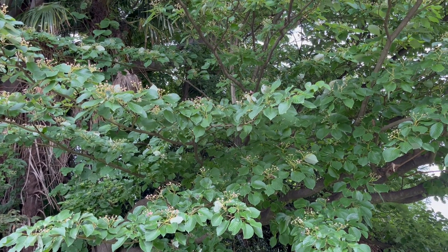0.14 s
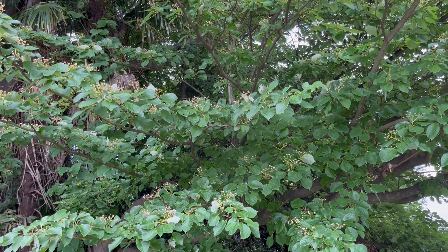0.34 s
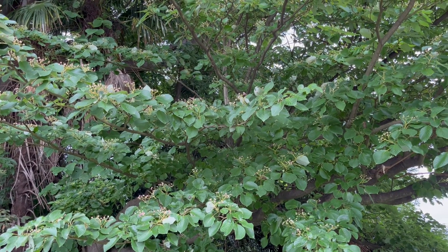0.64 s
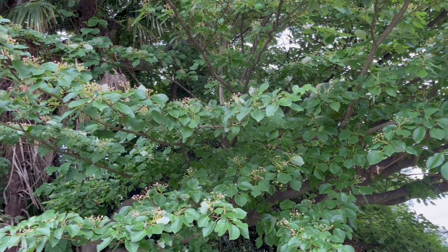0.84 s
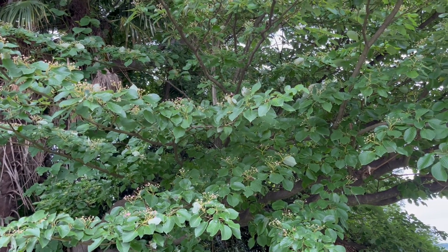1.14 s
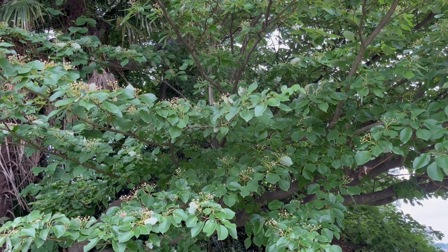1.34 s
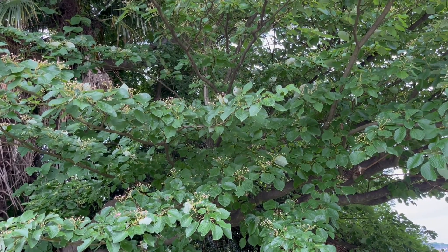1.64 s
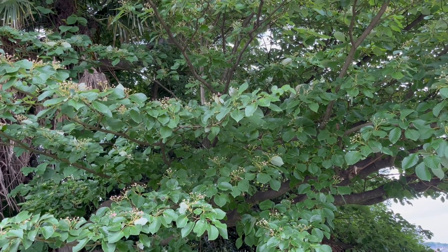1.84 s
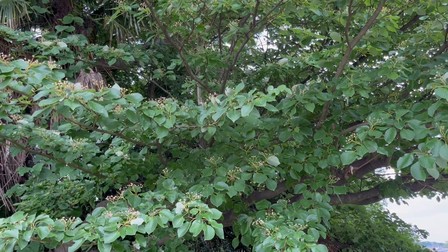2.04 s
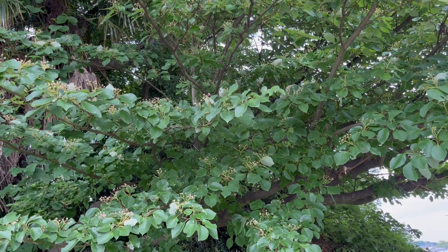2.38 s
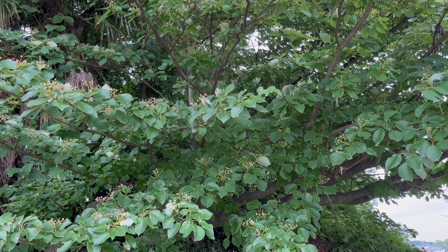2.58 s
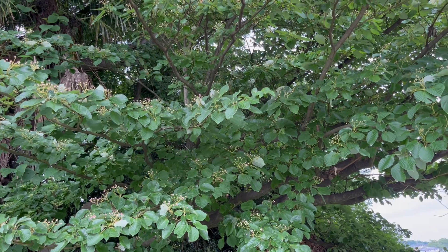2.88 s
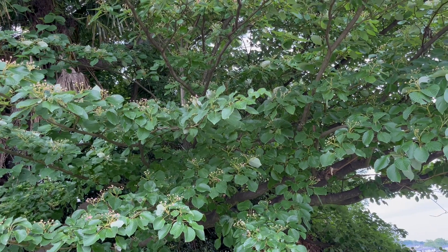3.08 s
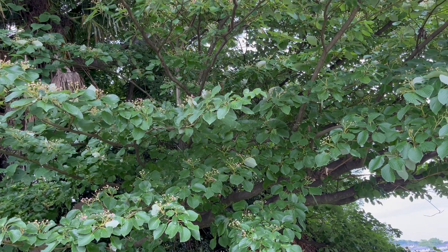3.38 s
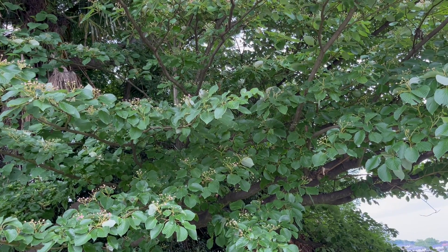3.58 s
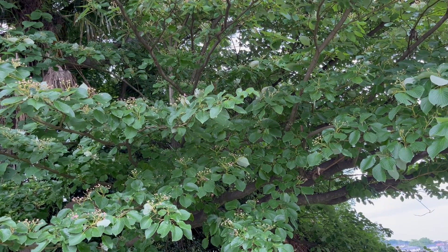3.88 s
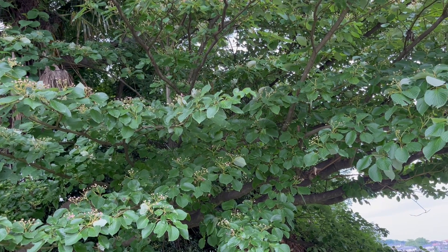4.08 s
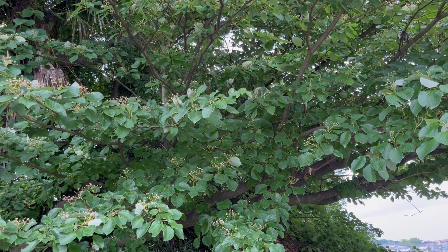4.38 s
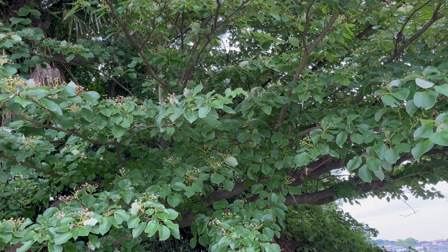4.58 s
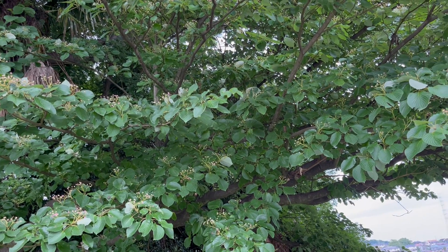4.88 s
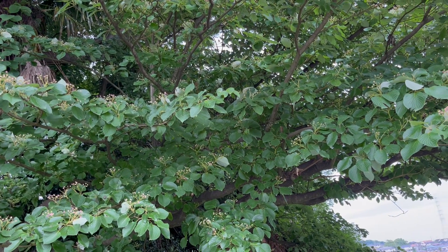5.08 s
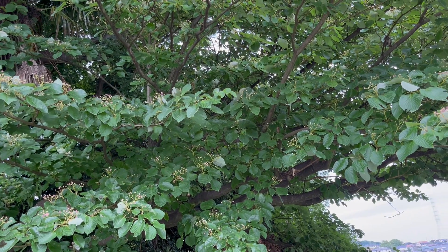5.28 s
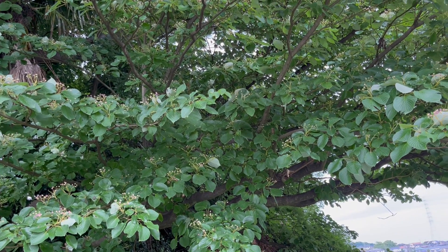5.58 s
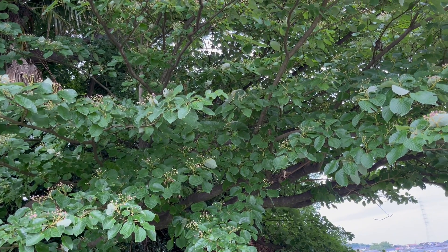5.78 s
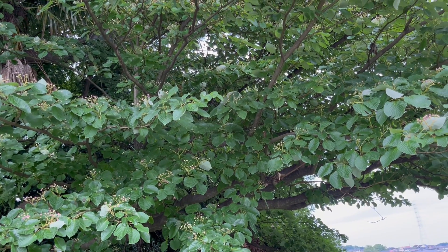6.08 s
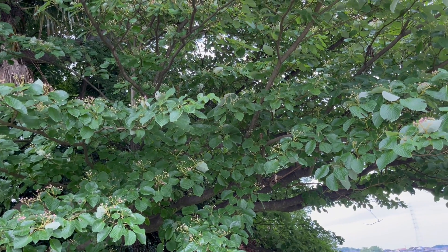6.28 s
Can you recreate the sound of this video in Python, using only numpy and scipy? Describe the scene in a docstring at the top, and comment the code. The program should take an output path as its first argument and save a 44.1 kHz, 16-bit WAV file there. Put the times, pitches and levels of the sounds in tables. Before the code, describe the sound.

Cicadas in leafy trees at the edge of open fields, heard in stereo. From 0 to 2.3 seconds the nearest, a little left, alternates ringing buzzes around 4.5 kHz with thin, very high sizzles at about 0.3-0.5, 0.6-0.8, 1.2-1.5 and 2.0-2.3; short rasps and faint whistles edge some notes. From about 2.3 to 2.6 its rapid clicks slow and it tips into a long rattling trill, strongest until 3.5, then ever slower, looser and fainter until 5.6. At about 5.7 it starts again with quick ringing pulses up to 6.4. Throughout, neighbours deeper in the foliage add softer buzzes and high sizzling bursts, notably around 1.8, 2.7, 3.3, 3.9-4.4 and 4.8, blurred by leaf echoes. Behind them lie a continuous, gently swelling insect hiss and a faint low rumble.

```python
"""Cicadas sing in the trees at the edge of fields, over a far chorus and a low rumble.
The nearest one swings between a ringing 4.5 kHz note and a thin 13 kHz sizzle, runs down in a long
rattling trill, then starts again. All along, neighbours join in with both voices.
Each song is a train of clicks that rings the insect's abdomen; echoes from leaves scatter the clicks.
The chorus and the open air are shaped noise."""
import sys
import numpy as np
from scipy import signal
from scipy.fft import rfft, irfft
from scipy.io import wavfile
from scipy.ndimage import uniform_filter1d

SR = 44100
rng = np.random.default_rng(int(sys.argv[2]) if len(sys.argv) > 2 else 0)


def transcribe(signal):
    """Save signal, clipped to [-1, 1], as a 16-bit WAV file at the path in sys.argv[1]."""
    frames = np.atleast_2d(signal).T
    limited = np.clip(frames, -1, 1)
    pcm = np.round(limited * 32767).astype(np.int16)
    wavfile.write(sys.argv[1], SR, pcm)


N = 283563
TIME = np.arange(N) / SR
BINS = np.fft.rfftfreq(N, 1 / SR)

# The near cicada's click rate before jitter; it sags into the trill and picks up after it.
# Columns: time_s [s], rate [clicks per second]
NEAR_CLICK_RATE = [(0, 171.7), (.15, 172.6), (.3, 173.3), (.72, 172.2), (1.05, 172.4), (1.57, 171.2),
                   (1.75, 169), (1.85, 167.1), (1.95, 165.3), (2.29, 163.8), (2.37, 156.3), (2.46, 150),
                   (2.6, 144), (5.6, 169), (5.8, 169.8), (6.08, 173.1), (6.2, 174.3), (6.41, 175.8)]
# Tone colour of every sizzle. Columns: pitch_hz [Hz], relative level_db [dB]
SIZZLE_SPECTRUM = [(7000, -77), (8800, -33.5), (9600, -15.5), (10400, -15), (11200, -9), (12000, -6),
                   (12800, -3), (13600, -4), (15000, -0.5)]


def near_cicada():
    """One train of clicks rings the abdomen, rasps at the ends of notes, or sizzles when it is damped."""
    clicks = tymbals(NEAR_CLICK_RATE, jitter=.0016, rough=.08, limp=.06, unevenness=.08)
    scattered = foliage(spread(clicks, lag=.0036), wet_db=-2, t60=.2, stir=1.8)
    notes = ringing_notes(scattered)
    low_voice = notes * gain_of(-1.96) + whistle(notes) * gain_of(0.5) + rasp(scattered) * pan(left_db=3.5)
    return low_voice + near_sizzle(clicks) * gain_of(2.5)


def ringing_notes(scattered):
    """Notes whose clicks ring the abdomen, stretched to other sharp modes for each note."""
    # Columns: start_s [s], end_s [s], level_db [dB, before the voice's gain],
    # swell_db [dB from start to end], fade [dB per s], left_minus_right_db [dB],
    # modes as (pitch_hz [Hz], boost_db [dB])
    note_table = [(-.02, 0.15, -27, 1.5, 221, 0.79, [(4310, 6.5), (4480, 2), (4830, 10), (5168, 14.5),
                  (5515, 9), (6550, 7), (7240, 9)]), (0.215, 0.3, -35, 0, 131, 1.8, [(4330, 4), (4800, 13),
                  (6580, 8), (7100, 9)]), (0.84, 1.03, -28.5, 4.5, 100, 3.2, [(4140, 6.5), (4310, -0.5),
                  (4480, 8), (4830, 7), (5000, 0), (5170, 10), (6550, 11.5)]),
                  (1.564, 1.616, -29.5, 1.5, 200, 4.2, [(3940, 3), (4100, 5), (4440, 4), (4780, 8.5),
                  (4950, 6)]), (1.705, 1.77, -31, 2.5, 280, 3.9, [(4060, 9), (4400, 2), (4735, 10),
                  (4900, 5), (5240, 7), (6430, 10.5)]), (1.855, 1.899, -29, 1.5, 188, 3.55, [(4010, 4),
                  (4345, 8.5), (4845, 9), (5180, 11), (5515, 5), (6860, 9)]),
                  (2.335, 2.35, -34.5, -1, 200, 4.6, [(3680, 18), (4330, 7), (4700, 3), (5400, 10)]),
                  (2.412, 2.44, -33.5, -2.5, 200, 3.7, [(3980, 13), (4280, 11), (4600, 11), (4910, 18)]),
                  (2.51, 2.564, -35.5, -1, 130, 3.6, [(3900, 18), (4270, 10.5), (4450, 1), (4700, 7)]),
                  (5.737, 5.789, -32.5, 1, 198, 4.8, [(3730, 6), (4070, 3), (4410, 1.5), (4740, 4),
                  (5080, 8.5)]), (5.879, 5.962, -32, 1.5, 200, 3.5, [(4110, 7), (4440, 1), (4790, 9),
                  (5300, 9), (5640, -4)]), (6.055, 6.121, -28.5, 0, 200, 4.1, [(4150, 3), (4330, 10.5),
                  (4850, 9), (5200, 7), (5540, 8)]), (6.185, 6.27, -27, 2.5, 328, 5.5, [(4360, 10.5),
                  (4535, 5), (4710, 6), (4885, 13), (5230, 4), (6100, 5)]),
                  (6.38, 6.45, -36.5, -1, 130, 3.5, [(4395, -1), (4900, 6), (5100, 9)])]
    # Columns: pitch_hz [Hz], relative level_db [dB]
    note_spectrum = [(1500, -77), (2300, -16), (3000, -21), (3600, -1.5), (4000, 3), (4400, 8.5),
                     (4900, 2.5), (5300, 1), (5700, -2), (6300, -3.5), (6900, -3), (7400, -5.5),
                     (8200, -63)]
    notes = 0
    for *note, fade, left_db, modes in note_table:
        body = abdomen(scattered, note_spectrum, modes)
        notes = notes + body * phrases([note], attack=0.105, fade=fade) * pan(left_db)
    return notes


def whistle(notes):
    """The hollow abdomen tunes in to one overtone of the click rate, which swells to a whistle."""
    # Columns: middle_s [s], level_db [dB, before the whistle's gain], half_length_s [s]
    whistle_table = [(0.124, -37, 0.036), (1.007, -42, 0.042), (1.589, -32, 0.02), (1.855, -28, 0.021),
                     (6.226, -43, 0.034)]
    overtone_number = 26
    overtone = steadied(resonate(notes, overtone_number * curve(NEAR_CLICK_RATE), width=240))
    swells = sum(gain_of(db) * np.exp(-((TIME - middle) / half) ** 2) for middle, db, half in whistle_table)
    return overtone * swells


def rasp(scattered):
    """A lower rasp as a note opens or closes and the abdomen's resonance slides."""
    # Columns: start_s [s], end_s [s], level_db [dB, before panning], swell_db [dB],
    # from_hz [Hz], to_hz [Hz]
    rasp_table = [(.195, .255, -38.5, -2, 3670, 3300), (1.06, 1.11, -41, -8, 4200, 3414),
                  (1.92, 1.96, -41.5, -4, 3690, 3110), (5.67, 5.72, -39, 2, 3335, 4020),
                  (6.285, 6.35, -37.5, -7, 3900, 3170)]
    # Columns: pitch_hz [Hz], relative level_db [dB]
    rasp_spectrum = [(2000, -48), (2550, -0.5), (2800, 3.5), (3300, -2), (3700, 6), (4100, -5), (4500, 2),
                     (5000, 11), (5700, 4), (7050, 27), (8000, -67)]
    body = abdomen(scattered, rasp_spectrum, modes=())
    slur = resonate(body, curve(glides(rasp_table)), width=1000)
    return steadied(slur) * phrases(rasp_table, attack=0.02, fade=220)


def near_sizzle(clicks):
    """Thin treble notes: the clicks with the abdomen damped."""
    # Columns: start_s [s], end_s [s], level_db [dB, before the sizzle's gain], swell_db [dB]
    sizzle_table = [(.32, .5, -31.5, 5), (.6, .81, -28, -1.5), (1.16, 1.49, -28, 0), (2.04, 2.29, -29, 2)]
    # one channel serves both sides
    sizzle = foliage(ring(clicks, SIZZLE_SPECTRUM), wet_db=8.5, t60=0.48)[:1]
    return steadied(sizzle) * phrases(sizzle_table, attack=0.15, fade=95)


def trill():
    """The song runs down: the clicks slow and loosen into a rattle, and the abdomen's modes waver over it."""
    # Slowing, quickly at first. Columns: time_s [s], rate [clicks per second, before jitter]
    rate = [(2.46, 151.5), (2.6, 138.5), (2.75, 126.5), (3.35, 111.5), (4.25, 90.5), (5.65, 74)]
    # Fading away. Columns: time_s [s], level_db [dB, before flutter and the final gain]
    levels = [(2.6, -32.5), (2.9, -32.5), (3.55, -33), (4.2, -38), (4.5, -41), (4.95, -43.5), (5.63, -47)]
    # Losing the regular beat. Columns: time_s [s], looseness [0-1]
    looseness = [(2.45, .1), (2.7, .4), (3.0, .8), (5.6, 1)]
    # Sharp modes that sing on. Columns: pitch_hz [Hz, before wander], level_db [dB, before waver]
    mode_table = [(3900, -8), (4090, -8), (4330, -7), (4460, -7), (4720, -5), (4880, -5)]
    # Columns: pitch_hz [Hz], relative level_db [dB]
    trill_spectrum = [(1200, -71), (2000, -52), (2700, -24.5), (3300, -14.5), (3900, -1.5), (4380, 2.5),
                      (4900, -5), (5400, -13), (5900, -13.5), (6500, -13), (7200, -32), (7700, -64),
                      (8400, -61)]
    wander, waver_db = .007, 4  # trembling of each mode: rms share of its pitch, rms dB of its strength

    loose = curve(looseness)
    clicks = tymbals(rate, jitter=.005 * loose, rough=.22 * loose, crackle=.36, limp=.1, unevenness=.26)
    body = ring(spread(clicks, lag=.001), trill_spectrum)
    tones = 0
    for hz, db in mode_table:
        pitch = hz * (1 + wander * drift(size=8000))
        strength = gain_of(db + waver_db * drift(size=5000))
        tones = tones + resonate(body, pitch, width=180) * strength
    rattle = foliage(body + tones, wet_db=1.5, t60=.13)
    flutter = gain_of(0.6 * drift(size=900))
    level = gain_of(curve(levels)) * gate(levels[0][0], levels[-1][0], attack=0.33, fade=398)
    return rattle * flutter * level * gain_of(-1.5) * pan(left_db=6.5)


def neighbours():
    """Cicadas deeper in the trees: clicks ring or sizzle as in the near one, blurred by echoes."""
    # A neighbour's ringing notes. Columns: start_s [s], end_s [s], level_db [dB, before the final gain],
    # swell_db [dB], first_rate and last_rate [clicks per second, before jitter],
    # modes as (pitch_hz [Hz], boost_db [dB])
    note_table = [(0.354, 0.39, -45, -8, 193, 194, [(4054, -1), (4440, -5), (4820, -2)]),
                  (.58, 0.708, -43.5, -3, 201.8, 202, [(4043, 4), (4447, 10), (4845, 2)]),
                  (1.112, 1.221, -41.5, -1, 193.3, 192.8, [(4020, -4), (4830, 13), (5030, 4), (5210, 11)]),
                  (1.28, 1.353, -44, 1.5, 188.2, 186.6, [(3935, 2), (4312, 3), (4490, 9)]),
                  (1.996, 2.224, -41.5, -4, 191.5, 193, [(4030, -4), (4420, 6), (4600, 2), (4790, 6)]),
                  (4.43, 4.579, -44, -5, 169.6, 169.2, [(3752, 16), (4091, 4), (4603, 4)]),
                  (4.797, 4.932, -46.5, -0.5, 191.6, 192.2, [(3830, 8.5), (4790, 10)]),
                  (4.999, 5.044, -48, 1, 195.6, 197.4, [(4530, 9), (5110, 19)]),
                  (5.085, 5.181, -42.5, 2, 198.8, 201, [(4390, 14.5), (4780, 15), (5200, 11)]),
                  (5.24, 5.38, -48, 0, 203.5, 204.4, [(4070, 3.5), (4900, 16), (5310, 20)]),
                  (5.55, 5.7, -47, 11, 207, 205, [(4110, 10), (4515, 10)])]
    # Sizzling notes from further back. Columns: as above, without modes
    far_table = [(0, .18, -43, 5, 204.5, 135), (.96, 1.04, -42, .3, 190, 195),
                 (1.73, 1.94, -35.5, 0.5, 170, 200), (2.57, 2.84, -36, 0, 155, 187),
                 (2.92, 2.98, -39.5, 0, 186.5, 157), (3.16, 3.44, -37.5, 2, 184, 150),
                 (3.54, 3.72, -42, 3, 185, 170), (3.87, 4.37, -35, -0.5, 176, 187),
                 (4.64, 4.95, -37.5, 0.5, 172, 167), (5.34, 5.52, -39.5, 3.5, 180, 183),
                 (5.68, 5.77, -41, 0, 200, 210), (5.92, 6.1, -36.5, 1.5, 150, 177),
                 (6.35, 6.45, -36, 4, 200, 210)]
    # Columns: pitch_hz [Hz], relative level_db [dB]
    neighbour_spectrum = [(2000, -76.5), (3400, -14), (4000, 7), (4400, 0), (4800, 1), (5200, -1.5),
                          (5600, -9.5), (6700, -11.5), (7500, -10), (8400, -93)]

    clicks = tymbals(glides(note_table), jitter=.0012, rough=.06, limp=.06, unevenness=.06)
    scattered = foliage(spread(clicks), wet_db=-4, t60=.09)
    notes = 0
    for *note, modes in note_table:
        body = abdomen(scattered, neighbour_spectrum, modes)
        notes = notes + body * phrases([note], attack=0.053, fade=98)
    low_voice = notes * gain_of(2.6) * pan(left_db=5.5)

    far_clicks = tymbals(glides(far_table), jitter=0.00308, rough=0.46)
    sizzle = foliage(ring(far_clicks, SIZZLE_SPECTRUM), wet_db=9.5, t60=0.2)[:1]
    lull = gain_of(-50)  # a faint sizzle lingers between the notes
    sizzling = np.hypot(phrases(far_table, attack=0.21, fade=90), lull)
    return low_voice + steadied(sizzle) * sizzling * gain_of(4.0)


def far_chorus():
    """Countless distant cicadas merge into a gently swelling hiss, made of shaped noise."""
    # Columns: time_s [s], level_db [dB, before panning]
    levels = [(0, -40.5), (.5, -42), (1.3, -40.5), (3, -40), (4.8, -41), (5.3, -40), (5.9, -40),
              (6.4, -38.5)]
    # Columns: pitch_hz [Hz], relative level_db [dB]
    chorus_spectrum = [(1200, -44), (1800, -22), (2400, -16), (3000, -7), (3600, -2.5), (4200, 2),
                       (4800, 1.5), (5600, -9), (6600, -5), (7400, -12.5), (8300, -100)]
    return wash(chorus_spectrum, likeness=0.72) * gain_of(curve(levels)) * pan(left_db=2.0)


def open_air():
    """A low rumble and the soft roar of the distance: shaped noise that grows slightly, then eases."""
    # Columns: pitch_hz [Hz], relative level_db [dB]
    air_spectrum = [(10, -36), (25, -5), (35, -8.5), (50, -0.5), (65, 2.5), (85, -2), (130, -9.5),
                    (400, -12.5), (600, -11), (900, -13), (1100, -18.5), (1380, -13), (1700, -26.5),
                    (2500, -28), (6000, -65)]
    # How alike the channels are. Columns: pitch_hz [Hz], likeness [share, held to at most 1 in wash]
    likeness = [(50, 2.5), (120, 0.64), (300, 1), (700, 0.22), (1400, 1.3), (3000, 6)]
    # Columns: pitch_hz [Hz], left_minus_right_db [dB]
    balance = [(50, 1.5), (150, 1), (350, 2.5), (700, -3), (1400, -5), (2000, -0.5)]
    sides = np.array([[1], [-1]])
    air = rfft(wash(air_spectrum, read(likeness))) * gain_of(sides * read(balance) / 2)
    level_db = curve([(0, -46.5), (3, -46), (4.3, -45), (6.4, -45.5)])
    return irfft(air, N) * gain_of(level_db)


def tymbals(rate, jitter, rough, crackle=0.19, limp=0.24, unevenness=0.11):
    """Two tymbals buckle in turn, one a little harder; their ribs crackle for a share of each cycle."""
    turns = np.cumsum(curve(rate) * (1 + jitter * drift(size=200))) / SR
    count = np.arange(1, int(turns[-1]))
    at = np.interp(count, turns, np.arange(N))[:, None]
    force = 1 + limp * (-1) ** count + unevenness * rng.standard_normal(len(count))
    # a short windowed sinc places each click between samples
    near = at.astype(int) + np.arange(-8, 9)
    pulse = np.sinc(near - at) * np.sinc((near - at) / 9)
    clicks = np.zeros(N)
    np.add.at(clicks, np.clip(near, 0, N - 1), force[:, None] * pulse)
    ribs = np.exp(-(turns % 1) / crackle) * rng.standard_normal(N)
    rough = np.clip(rough, 0, 1)
    return (1 - rough) * evened(clicks) + rough * evened(ribs)


def spread(clicks, lag=0.0034, span_hz=1000, centre_hz=4600):
    """The ribs buckle one after another, high ones first: clicks are drawn out by lag seconds per span."""
    phase = np.pi * lag * (BINS - centre_hz) ** 2 / span_hz
    return irfft(rfft(clicks) * np.exp(1j * phase), N)


def abdomen(clicks, colour, modes):
    """A broad ring with the sharp modes of one posture on top, in both channels."""
    return steadied(np.array([ring(side, colour, modes) for side in clicks]))


def ring(x, colour, modes=(), width_hz=106, size=4096):
    """Causal filter: each click rings on with the given spectrum, raised at the sharp modes."""
    hz = abs(np.fft.fftfreq(size, 1 / SR))
    peaks = sum(db * np.exp(-((hz - centre) / width_hz) ** 2) for centre, db in modes)
    log_gain = np.log(gain_of(np.maximum(read(colour, hz) + peaks, -100)))
    # minimum phase: the ring starts at once and only follows the click
    response = np.fft.ifft(np.exp(np.conj(signal.hilbert(log_gain)))).real
    return signal.oaconvolve(x, response[:size // 2])[:N]


def resonate(x, hz, width):
    """A resonance of gain 1, width in Hz, that follows the curve hz."""
    turn = np.exp(2j * np.pi * np.cumsum(hz) / SR)
    r = np.exp(-np.pi * width / SR)
    # shift the moving pitch down to zero, smooth there, and shift back
    smooth = signal.lfilter([(1 - r) ** 2], [1, -2 * r, r * r], x / turn)
    return 2 * (turn * smooth).real


def foliage(x, wet_db, t60, stir=0.426, count=700):
    """Direct sound plus echoes from leaves and branches, which shift as they stir (cycles per second)."""
    # about 2000 echoes per second, falling by 60 dB in t60 seconds
    at = (np.arange(count) + 2 + rng.random((4, count))) * SR / 2000
    strength = rng.choice([-1, 1], at.shape) * gain_of(-60 * at / SR / t60)
    taps = np.zeros((4, SR // 2))
    np.put_along_axis(taps, at.astype(int), strength, 1)
    echoes = signal.oaconvolve(x[None], taps / np.linalg.norm(taps[0]), axes=1)[:, :N]
    # each channel turns between two sets of echoes
    turn = 2 * np.pi * stir * TIME
    moving = np.cos(turn) * echoes[:2] + np.sin(turn) * echoes[2:]
    return steadied(x + gain_of(wet_db) * moving)


def wash(colour, likeness):
    """Steady noise from all around, partly alike in the two channels."""
    a, b = rfft(rng.standard_normal((2, N)))
    same = np.clip(likeness, -1, 1)
    pair = np.array([a, same * a + np.sqrt(1 - same ** 2) * b])
    return evened(irfft(pair * gain_of(read(colour)), N))


def phrases(notes, attack, fade):
    """Gain over time of a run of notes: each rises, swells evenly while it is held, and fades."""
    gains = []
    for start, end, db, swell_db, *_ in notes:
        swell = swell_db * np.interp(TIME, [start, end], [-.5, .5])
        gains.append(gate(start, end, attack, fade) * gain_of(db + swell))
    return np.max(gains, axis=0)


def gate(start, end, attack, fade):
    """A smooth rise over attack seconds up to start, a hold, and from end a fade in dB per second."""
    rise = np.clip(1 + (TIME - start) / attack, 0, 1)
    return np.sin(np.pi / 2 * rise) ** 2 * gain_of(-fade * np.maximum(TIME - end, 0))


def glides(notes):
    """Click rate or resonance over a run of notes: each slides from its first value to its last."""
    points = []
    for start, end, _, _, first, last, *_ in notes:
        points += [(start, first), (end, last)]
    return points


def curve(rows):
    """A time table, joined by straight lines."""
    return np.interp(TIME, *np.transpose(rows))


def read(points, hz=BINS):
    """A spectrum table, joined on a log-frequency axis."""
    f, value = np.transpose(points)
    return np.interp(np.log(hz + 1), np.log(f + 1), value)


def drift(size):
    """Slow chance of rms 1, smooth over size samples."""
    return evened(uniform_filter1d(uniform_filter1d(rng.standard_normal(N), size), size))


def gain_of(db):
    """Decibels to gain."""
    return 10 ** (np.asarray(db) / 20)


def pan(left_db):
    """Gains of the two channels, left_db apart."""
    return gain_of(np.array([[left_db], [-left_db]]) / 2)


def evened(x):
    """Scales to rms 1."""
    return x / np.sqrt(np.mean(x ** 2) + 1e-20)


def steadied(x, size=2200):
    """Holds the running rms, shared by all channels and smoothed over size samples, at 1."""
    power = uniform_filter1d(uniform_filter1d((x ** 2).mean(0), size), size)
    return x / np.sqrt(abs(power) + 1e-20)


def scene():
    """All the singers over the open air."""
    return near_cicada() + trill() + neighbours() + far_chorus() + open_air()


def record(dry):
    """The two microphone ports differ in phase; then a low-pass limits the band."""
    # Columns: pitch_hz [Hz], left_lead [radians]
    port_phase = [(60, 0), (250, -.3), (500, -1.1), (1500, -1.7), (1900, 0), (2400, 0), (2800, .8),
                  (4000, .4), (4700, .7), (5500, -.6), (7000, -1.6), (7700, -3), (9200, -3.3),
                  (10000, -4.7), (11200, -6.28), (12200, -6.28), (15300, -9.3)]
    sides = np.array([[1], [-1]])
    ports = irfft(rfft(dry) * np.exp(1j * sides * read(port_phase) / 2), N)
    edge_hz = 15300
    low_pass = signal.firwin(511, edge_hz, window=("kaiser", 9), fs=SR)
    return signal.oaconvolve(ports, low_pass[None], "same")


dry = scene()
out = record(dry)
transcribe(out)
```